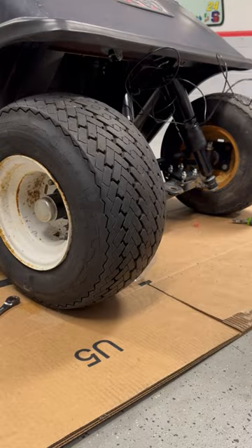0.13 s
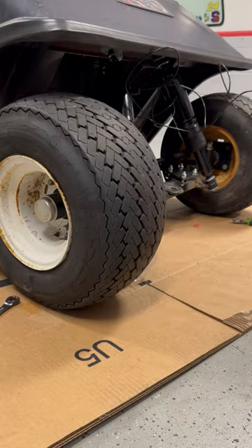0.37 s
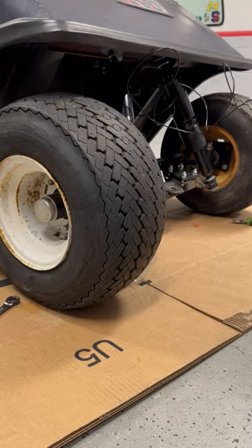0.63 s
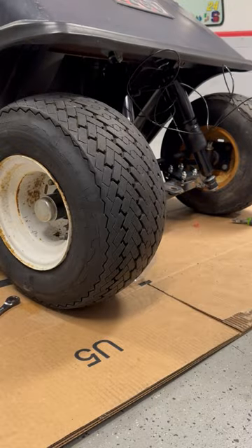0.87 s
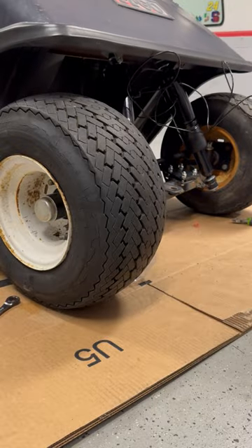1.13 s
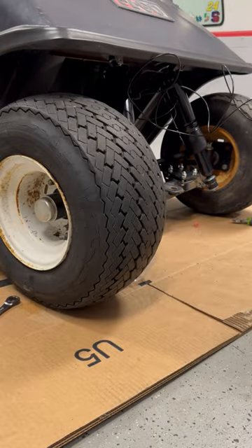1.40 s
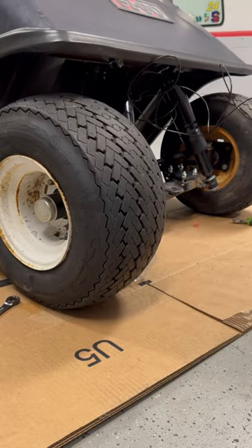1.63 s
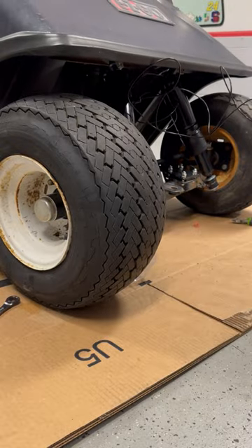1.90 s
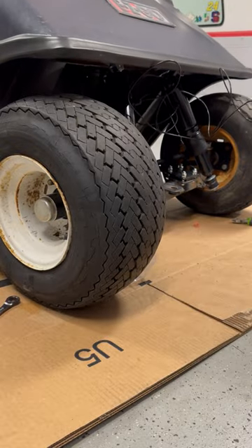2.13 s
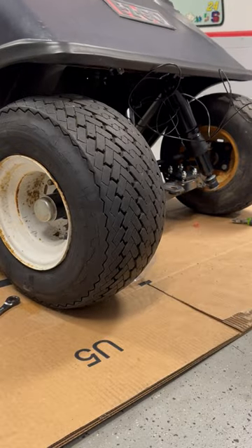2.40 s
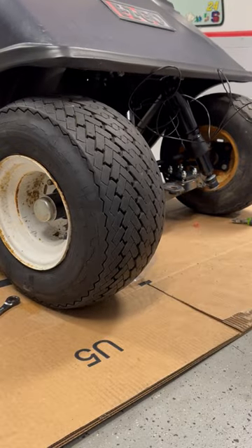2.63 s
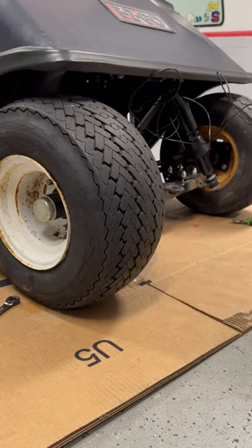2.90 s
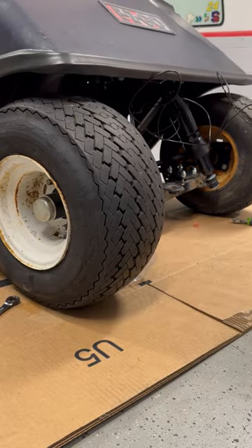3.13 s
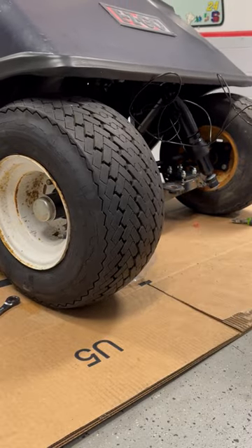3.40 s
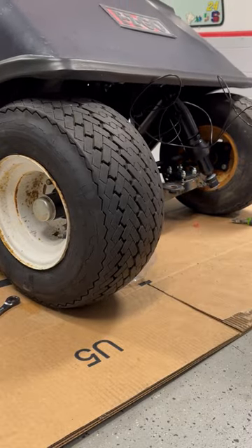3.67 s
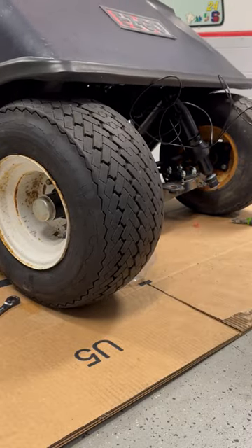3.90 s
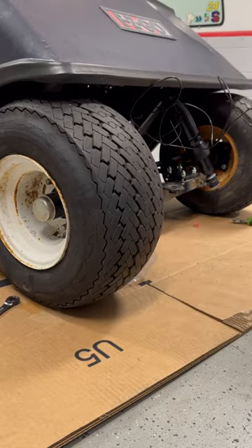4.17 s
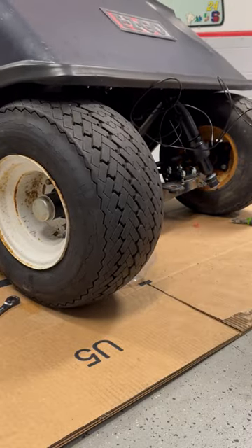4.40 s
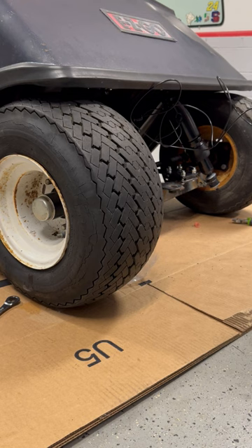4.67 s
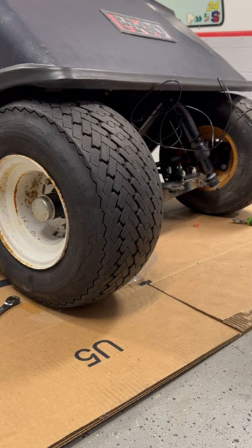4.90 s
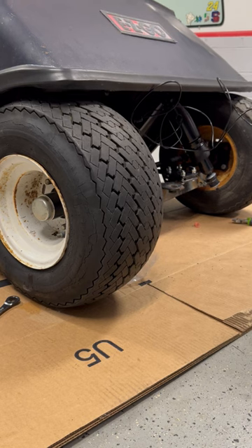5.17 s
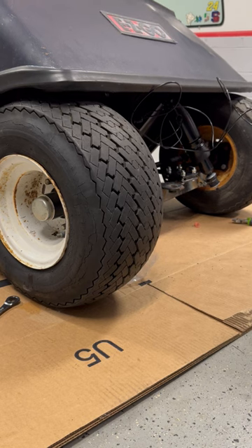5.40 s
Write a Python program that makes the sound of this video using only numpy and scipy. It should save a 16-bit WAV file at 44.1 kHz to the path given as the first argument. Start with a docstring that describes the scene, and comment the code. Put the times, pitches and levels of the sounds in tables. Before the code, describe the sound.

A faint dry tick at 0.05 seconds and a fainter one at 0.13 lead into a valve snapping open at 0.2. Compressed air spits with a brief bright ring, then hisses continuously, high and sharp, easing only very slightly. Small fittings whistle in breathy surges between 0.4 and 0.95, over a lower, airy pipe sound. A very faint bump falls at 0.3 and a low, muffled knock at 0.7. The flow is calmer until two hollow body knocks stand out at 2.16 and 2.24, the first strongest, with a little metallic rattle and short hall reverberation. Around 3.05 to 3.3 the shell gives a low, soft groan. Whistling surges return near 3.55 and from 4.3, joined by a brief low whoosh at 4.4 to 4.8. The hiss continues to the end at about 5.5. Close hand-held stereo pickup, with quiet workshop hum and faint background hiss underneath.

```python
"""In a workshop hall, a valve opens and compressed air hisses through the air shocks of a small vehicle.
The jet is bright, steady noise; hollow fittings and the supply pipe are noise bands that sing in surges.
The body knocks and groans as it shifts: decaying modes, struck or rubbed. Two ticks come before the air.
A hand-held stereo microphone hears the air and groans direct, the knocks and ticks also by way of the hall,
all over hum and faint hiss."""
import sys
import numpy as np
from scipy import signal
from scipy.fft import rfft, irfft, next_fast_len
from scipy.io import wavfile
from scipy.ndimage import uniform_filter1d, map_coordinates

SR = 44100
rng = np.random.default_rng(int(sys.argv[2]) if len(sys.argv) > 2 else 0)


def generate_wav(signal):
    """Clip the signal to [-1, 1] and save it as 16-bit WAV at the path in sys.argv[1]."""
    frames = np.transpose(np.atleast_2d(signal))
    scaled = np.clip(frames, -1, 1) * 32767
    pcm = np.round(scaled).astype(np.int16)
    wavfile.write(sys.argv[1], SR, pcm)


def makeup_ratio(level_db):
    """Linear amplitude ratio for a level in decibels (20 dB per factor of ten)."""
    decades = np.asarray(level_db, float) / 20
    return 10 ** decades


N = 244358  # length [samples]

# free jet of air: (frequency [Hz], relative density [dB per Hz])
NOZZLE_SPECTRUM = [(3000, -26.5), (5000, -16), (6600, -5.5), (7700, -2.5), (8700, -1), (9250, -3),
                   (10100, 0), (10800, 2.1), (11900, -2.5), (14600, -0.3), (15700, -3.5)]
# small hollow fittings that whistle: (frequency [Hz], width [Hz], relative level [dB])
FITTING_BANDS = [(2904, 236, -7.5), (3520, 540, -22), (4130, 390, -7), (4810, 290, 1.5), (5095, 240, -3.5),
                 (5980, 670, -3), (7080, 460, -7), (7880, 490, -8), (9060, 440, -10.5)]
# whistle as air surges through the fittings: (time [s], level [dB])
FITTING_SURGES = [(.2, -52), (.27, -39), (.39, -36), (.422, -32), (.46, -37.5), (.6, -35.5), (.625, -31.5),
                  (.67, -38.5), (.7, -32), (.905, -32), (.93, -38), (1.4, -39.5), (3.47, -39.5),
                  (3.56, -32.5), (3.64, -35), (3.7, -40.5), (4.12, -42), (4.25, -41), (4.32, -35),
                  (4.44, -35.5), (4.55, -33.5), (5.17, -36), (5.54, -35)]
# supply pipe, singing lower: (frequency [Hz], width [Hz], relative level [dB])
PIPE_BANDS = [(413, 380, -23.5), (1110, 230, -14.5), (1614, 174, -11), (2057, 147, 1), (2300, 170, -3.5),
              (3060, 410, -3.5)]
# supply pipe before its share of the surges: (time [s], level [dB])
PIPE_LEVEL = [(.2, -57), (.36, -48), (.65, -52), (.75, -47.5), (.92, -52), (1.05, -48), (2.1, -49),
              (4.2, -52), (4.6, -48.5), (5.54, -52)]
# nozzle rung by the first spit of air: (frequency [Hz], width [Hz], relative level [dB])
SPIT_BANDS = [(6500, 380, -10), (7600, 320, -1.5), (8700, 450, -0.5), (10560, 750, -4), (11400, 550, -2),
              (13300, 550, -13)]
# low rush of air: (time [s], level [dB])
WHOOSH_LEVEL = [(4.345, -85), (4.37, -64), (4.45, -55), (4.52, -59.5), (4.57, -51.5), (4.72, -55),
                (4.8, -62), (5, -70)]
# resonances of that rush, for one of two passes: (frequency [Hz], width [Hz], relative level [dB])
WHOOSH_BANDS = [(584, 190, -0.5), (850, 80, -3.5), (1280, 190, -5)]
# blows: (time [s], level [dB], pitch of the struck panel [Hz], slap level [dB], rattle level [dB])
BLOWS = [(.318, -41, 125, -60, -80), (.707, -22.5, 131, -38, -58), (2.158, -13.5, 305, -26, -25),
         (2.238, -26, 190, -34, -48)]
# modes of the body shell: (frequency [Hz], relative level [dB], 60 dB decay [s])
BODY_MODES = [(63.6, -3.5, 0.74), (91.3, -0.5, 0.14), (139.7, -3, 0.11), (174.2, -5, 0.13), (274, 6, 0.059),
              (295, -27, 1.6), (318.5, -27, 1.42), (356, -10, 0.19), (498, -6, 0.059), (670, -4, 0.089),
              (834, -13, .06), (1140, -17, .05), (1300, -8, 0.06)]
# loose metal: (frequency [Hz], width [Hz], relative level [dB])
RATTLE_BANDS = [(2610, 320, -7), (4920, 310, -1), (5660, 610, -3)]
# the body shifting on its springs: (time [s], length [s], level before the sag [dB])
SHIFTS = [(3.057, .25, -63), (3.43, 0.046, -79)]
# small clicks before the air: (time [s], level before the treble filter [dB])
CLICKS = [(.047, -45.5), (.134, -70)]
# decay of the hall: (frequency [Hz], 60 dB decay [s])
HALL_DECAY = [(60, 0.85), (160, 0.8), (300, 0.93), (500, 0.79), (1100, 0.45), (2900, 0.28), (8000, 0.38)]
# rumble of the hall: (frequency [Hz], relative density [dB per Hz])
RUMBLE_SPECTRUM = [(18, -38), (33, -17), (50, -3.5), (92, -2.5), (112, -3), (138, -21), (300, -31),
                   (520, -28), (900, -62)]
# faint hiss of the hall: (frequency [Hz], relative density [dB per Hz])
HISS_SPECTRUM = [(300, 1), (1000, -6), (2600, -4), (4200, -0.5), (6500, -5.5), (9500, -0.5), (10800, -10),
                 (16000, -30)]
# likeness of left and right in the noises: (frequency [Hz], likeness [0-1])
LIKENESS = [(60, .998), (130, 0.95), (300, 0.73), (700, 0.35), (1400, 0.83), (2100, 0.97), (2600, .55),
            (4200, 0.72), (4750, 0.47), (5300, 0.55), (5800, 0.78), (9500, 0.94), (10850, 0.98),
            (11150, 0.99), (13200, 0.97), (13800, 0.68)]
# phase between the microphone ports: (frequency [Hz], lead of the left [rad])
PORT_PHASE = [(2300, 0), (2800, 1.45), (3150, 1.5), (3550, 1.2), (4200, 0.9), (4520, 1.33), (4850, 0.82),
              (5300, -0.8), (5700, 0), (6700, -1.2), (10800, -2.5), (11150, -3), (13200, -3), (13800, -3),
              (15600, -5)]

VALVE_S, VALVE_RISE_S = 0.197, 0.0064  # the valve snaps open; time constant of the rise
CALM_DB = -41  # whistle level from which a surge is counted
JET_DB, JET_SAG_DB_PER_S = -34.5, 0.37  # jet at the opening, in calm; its sag as pressure falls
JET_FOLLOWS, PIPE_FOLLOWS = 0.24, 0.16  # shares of each surge [dB per dB]
GROAN_RISE_S, GROAN_FALL_S, GROAN_SAG_DB_PER_S = 0.036, 0.026, 40
LOW_HZ, TOP_HZ = 32.2, 15730  # the microphone loses the bass below and everything above


def jet(since, surge_db, flutter):
    """Free turbulence at the nozzle: bright noise that sags with the pressure and takes a share of the surges."""
    level_db = JET_DB - JET_SAG_DB_PER_S * since + JET_FOLLOWS * surge_db
    unsteady_db = 0.35 * flutter + 0.3 * wobble(12.0)
    return makeup_ratio(level_db + unsteady_db) * rush(shape(NOZZLE_SPECTRUM), patchy_db=0.5)


def fittings(flutter):
    """Small cavities whistle as the flow surges: narrow bands of noise."""
    unsteady_db = 0.45 * flutter + 0.73 * wobble(8.3)
    return makeup_ratio(track(FITTING_SURGES) + unsteady_db) * rush(bands(FITTING_BANDS), patchy_db=0.3)


def pipe(surge_db, flutter):
    """The longer air column of the supply pipe sings lower and takes a share of the surges."""
    level_db = track(PIPE_LEVEL) + PIPE_FOLLOWS * surge_db
    unsteady_db = 0.5 * flutter + 0.5 * wobble(11)
    return makeup_ratio(level_db + unsteady_db) * rush(bands(PIPE_BANDS), patchy_db=0.8)


def spit(since):
    """The first spit of air rings in the nozzle and falls 60 dB in 0.59 s."""
    return makeup_ratio(-27 - 60 * since / 0.59) * rush(bands(SPIT_BANDS), patchy_db=3.0)


def whoosh():
    """A low rush of air: noise passed twice through the same resonances."""
    twice = lambda hz: bands(WHOOSH_BANDS)(hz) ** 2
    return makeup_ratio(track(WHOOSH_LEVEL, -120)) * rush(twice, patchy_db=2.0)


def air():
    """The valve lets the flow start almost at once; jet, fittings and pipe share surges and a flutter."""
    since = np.maximum(np.arange(N) / SR - VALVE_S, 0)  # seconds since the opening
    valve = 1 - np.exp(-since / VALVE_RISE_S)
    flutter = wobble(30)
    surge_db = track(FITTING_SURGES) - CALM_DB
    flow = jet(since, surge_db, flutter) + fittings(flutter) + pipe(surge_db, flutter) + spit(since)
    return valve * flow + whoosh()


def knocks():
    """Each blow builds over about one swing of its panel, with a slap of noise; metal rattles just ahead."""
    out, shake, t = np.zeros(N + SR), np.zeros(N), np.arange(SR) / SR
    noises = rng.standard_normal((len(BLOWS), SR))
    for (s, db, panel_hz, slap_db, rattle_db), noise in zip(BLOWS, noises):
        around_panel = hollow([(1.09 * panel_hz, 1.13 * panel_hz, 0)])
        slap = unit(filtered(noise, around_panel)) * makeup_ratio(slap_db - 60 * t / 0.25)
        build = 1 - np.exp(-t * panel_hz / 0.97)
        blow = makeup_ratio(db) * build * shell(panel_hz)
        out[round(s * SR):][:SR] += blow + slap
        # the rattle starts 4 ms before the blow
        rattle = makeup_ratio(rattle_db - 60 * t / 0.14) * (1 - np.exp(-t / 0.00042))
        shake[round((s - 0.004) * SR):][:SR] += rattle
    loose_metal = unit(filtered(rng.standard_normal(N), hollow(RATTLE_BANDS)))
    return out[:N] + shake * loose_metal


def shell(panel_hz):
    """The body's modes after a tap; those near the struck panel's pitch are favoured."""
    t = np.arange(SR) / SR
    near = lambda hz: 1 / (1 + (np.log(hz / panel_hz) / 0.43) ** 2)
    return sum(near(hz) * makeup_ratio(db - 60 * t / t60) * np.sin(2 * np.pi * hz * t) for hz, db, t60 in BODY_MODES)


def groan():
    """Uneven, soft rubbing swells, sags and lets go; it drives the low modes of the same shell."""
    t = np.arange(N) / SR
    push = np.zeros(N)
    for s, length, db in SHIFTS:
        swell = np.clip((t - s) / GROAN_RISE_S, 0, 1) ** 2
        sag = makeup_ratio(db - GROAN_SAG_DB_PER_S * np.maximum(t - s, 0))
        let_go = np.exp(-np.maximum(t - s - length, 0) / GROAN_FALL_S)
        push += swell * sag * let_go
    soft_noise = unit(filtered(rng.standard_normal(N), lambda hz: hz < 330))
    rubbing = push * makeup_ratio(3.4 * wobble(40)) * soft_noise
    ring = shell(panel_hz=156)
    return signal.fftconvolve(rubbing, ring / np.linalg.norm(ring))[:N]


def ticks():
    """Short bright clicks: noise that falls 60 dB in 29 ms, thinned below 3 kHz."""
    out, t = np.zeros(N), np.arange(SR // 20) / SR
    for s, db in CLICKS:
        out[round(s * SR):][:len(t)] += makeup_ratio(db - 60 * t / 0.029) * rng.standard_normal(len(t))
    return filtered(out, lambda hz: 1j * hz / (3000 + 1j * hz))


def hall(x):
    """Each frequency of the hall's answer dies at its own speed; the bass arrives alike on both sides."""
    hz, t, z = signal.stft(rng.standard_normal((2, SR)), SR, nperseg=256)
    decay = makeup_ratio(-60 * t / along(HALL_DECAY, hz)[:, None])
    tail = signal.istft(z * decay, SR, nperseg=256)[1]
    late = np.pad(x, (500, 0))[None]  # the answer comes 500 samples (11 ms) late
    mid, side = signal.fftconvolve(late, tail / np.linalg.norm(tail[0]), axes=1)[:, :N]
    side = filtered(side, lambda f: 0.72 * f * f / (f * f + 500 ** 2))
    return np.array([mid + side, mid - side])


def floor():
    """Background of the workshop: lumpy rumble and faint hiss, both shaped noise."""
    rumble = makeup_ratio(-61.5 + 3.2 * wobble(9.2)) * rush(shape(RUMBLE_SPECTRUM), patchy_db=2.0)
    hiss = makeup_ratio(-64.5) * rush(shape(HISS_SPECTRUM), patchy_db=1.5)
    return rumble + hiss


def rush(response, patchy_db):
    """Stereo noise of rms 1, patchy in time and frequency, as alike left and right as LIKENESS says."""
    z = signal.stft(rng.standard_normal((2, N)), nperseg=512)[2]
    field = uniform_filter1d(rng.standard_normal(z.shape[1:]), size=6, axis=0)
    field = uniform_filter1d(field, size=10, axis=1)
    pair = signal.istft(z * makeup_ratio(patchy_db * unit(field)), nperseg=512)[1][:, :N]
    turn = lambda hz: np.arccos(np.clip(along(LIKENESS, hz), -1, 1)) / 2
    mid, side = filtered(pair, lambda hz: response(hz) * [np.cos(turn(hz)), np.sin(turn(hz))])
    return unit(np.array([mid + side, mid - side]))


def hollow(peaks):
    """Causal resonances of alternating sign as a response."""
    def response(f):
        total = 0
        for k, (centre, width, db) in enumerate(peaks):
            damping = 1j * f * width
            total = total + (-1) ** k * makeup_ratio(db) * damping / (centre * centre - f * f + damping)
        return total
    return response


def bands(peaks):
    """Resonances whose noise powers add, as a response."""
    return lambda f: np.sqrt(sum(abs(hollow([peak])(f)) ** 2 for peak in peaks))


def shape(points):
    """A smooth spectrum as a response."""
    return lambda hz: makeup_ratio(along(points, hz))


def along(points, hz):
    """Value at hz from (frequency [Hz], value) points on a log axis."""
    f, v = np.transpose(points)
    return np.interp(np.log(hz + 1), np.log(f + 1), v)


def filtered(x, response):
    """x times a complex response of frequency, padded by at least half a second."""
    m = next_fast_len(x.shape[-1] + SR // 2)
    return irfft(rfft(x, m) * response(np.fft.rfftfreq(m, 1 / SR)), m)[..., :x.shape[-1]]


def wobble(rate):
    """A smooth random curve, rate knots a second."""
    knots = rng.standard_normal(int(N * rate / SR) + 4)
    return map_coordinates(knots, [np.arange(N) * rate / SR])


def track(rows, outside_db=None):
    """Level [dB] per sample from (time [s], level [dB]) rows."""
    return np.interp(np.arange(N) / SR, *np.transpose(rows), outside_db, outside_db)


def unit(x):
    """Scaled to rms 1."""
    return x / np.sqrt(np.mean(x ** 2) + 1e-20)


def scene():
    """Air, body and background together; only knocks and ticks are answered by the hall."""
    hits = knocks() + ticks()
    return air() + hits + makeup_ratio(-8.0) * hall(hits) + groan() + floor()


def band_limit(x):
    """A steep low-pass at the top of the band."""
    return signal.sosfilt(signal.butter(12, 17070, fs=SR, output="sos"), x)


def record(dry):
    """The two microphone ports hear the treble out of phase, within the microphone's band limits."""
    f, lead = np.transpose(PORT_PHASE)
    sides = np.array([[1], [-1]])  # half the phase on each side
    band = lambda hz: (hz < TOP_HZ) * (1j * hz / (LOW_HZ + 1j * hz)) ** 2
    ports = lambda hz: np.exp(0.5j * np.interp(hz, f, lead) * sides)
    mix = filtered(dry, lambda hz: band(hz) * ports(hz))
    return band_limit(mix)


dry = scene()
out = record(dry)
generate_wav(out)
```